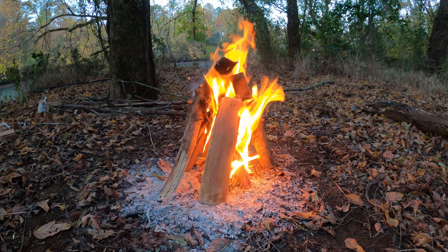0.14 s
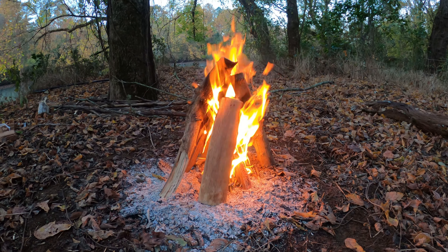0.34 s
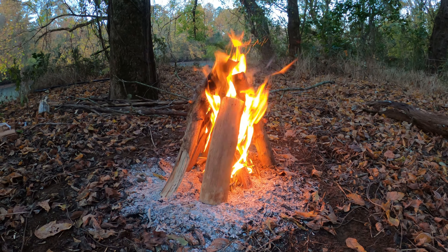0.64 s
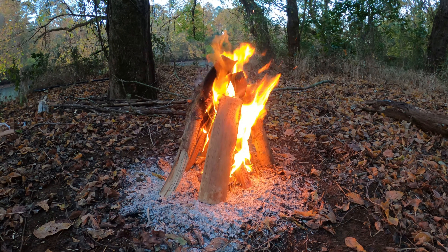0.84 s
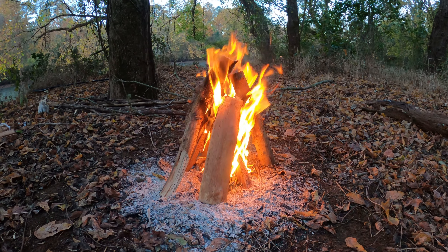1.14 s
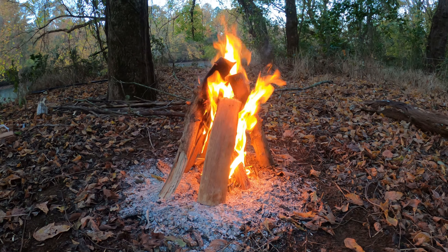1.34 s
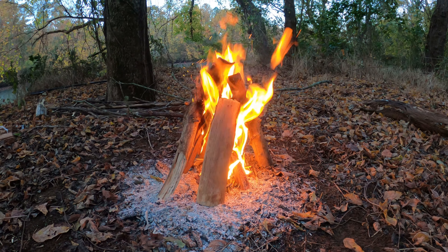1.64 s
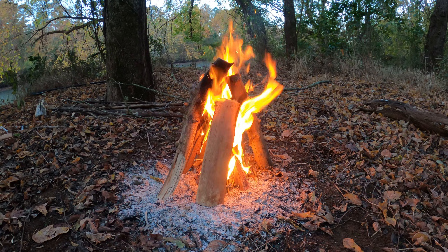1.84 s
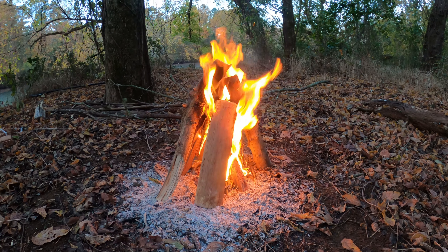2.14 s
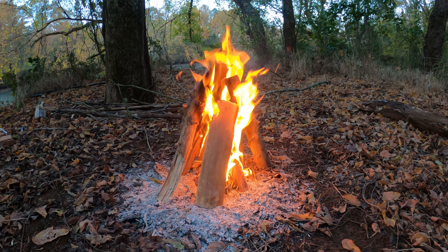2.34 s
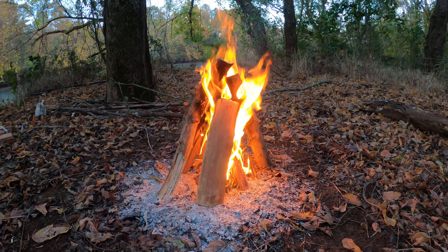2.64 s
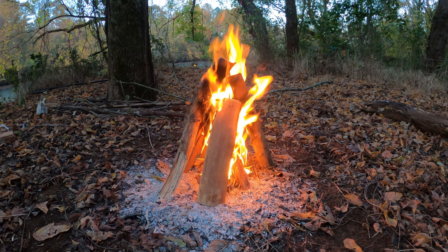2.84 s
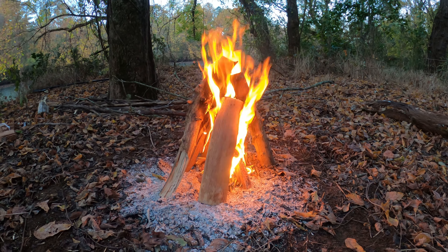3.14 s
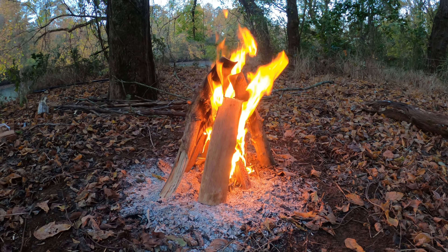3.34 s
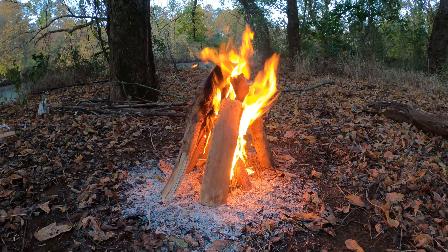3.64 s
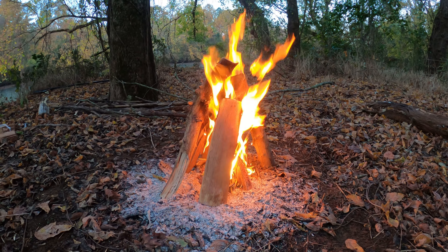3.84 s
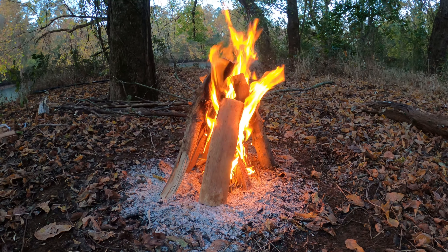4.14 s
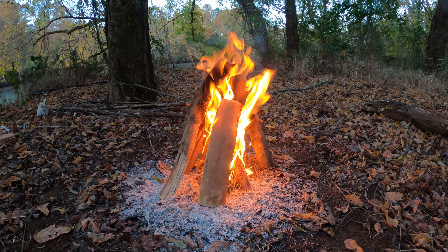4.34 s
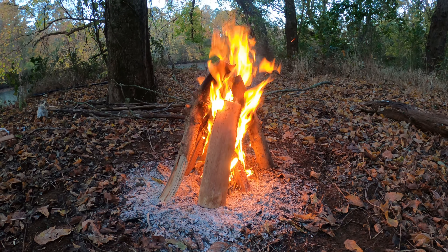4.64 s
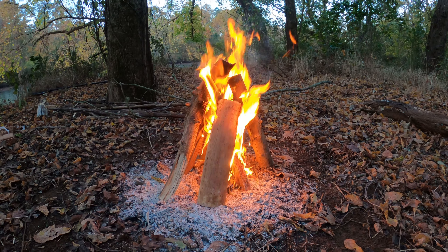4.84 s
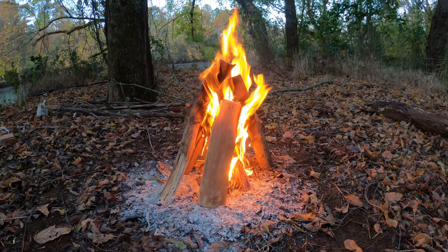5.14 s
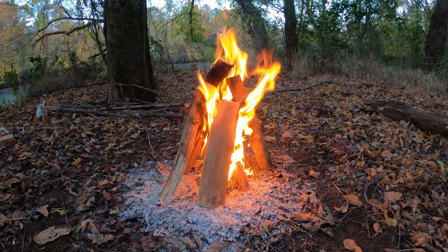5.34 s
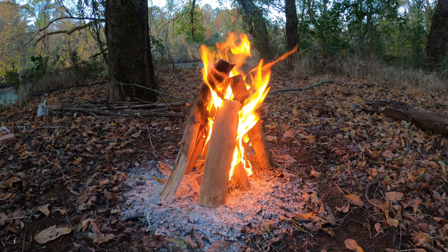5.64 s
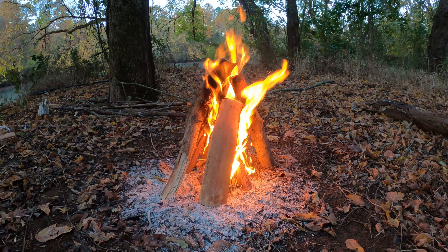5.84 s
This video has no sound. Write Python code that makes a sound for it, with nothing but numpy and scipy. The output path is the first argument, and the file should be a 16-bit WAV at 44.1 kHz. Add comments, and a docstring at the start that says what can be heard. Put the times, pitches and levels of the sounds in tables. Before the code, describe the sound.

Close wood fire outdoors: dry snapping pops, fine crackling and small gas puffs above a low steady rumble, with a faint far bird whistling.

```python
"""A campfire of split logs pops sharply: pockets of steam fracture the wood into brief, ringing pulses.
Gas jets spit as shaped noise and ignite in soft push-pull whumps; tiny fractures crackle in the char.
The flames rumble and boiling sap hisses as coloured, slowly modulated noise.
Leaf litter and trees answer through diffuse tails; a far bird whistles thinly, a swept tone heard by its tail alone."""
import sys
import numpy as np
from scipy import signal
from scipy.fft import rfft, irfft, next_fast_len
from scipy.io import wavfile
from scipy.ndimage import uniform_filter1d

SR = 44100
rng = np.random.default_rng(int(sys.argv[2]) if len(sys.argv) > 2 else 0)


def unload_audio(sound):
    """Save the sound as a 16-bit wav file, at the path given as the first command line argument."""
    columns = np.transpose(np.atleast_2d(sound))
    # keep every value between -1 and 1, then stretch to whole-number steps
    steps = np.round(np.clip(columns, -1, 1) * 32767)
    wavfile.write(sys.argv[1], SR, steps.astype(np.int16))


N = 264732
TIME = np.arange(N) / SR

# how hard the sap boils in the logs, before the hiss gain: time_s, level_db
BOILING = [(0.0, -59), (0.08, -61), (0.98, -66.5), (1.49, -60), (2.29, -65.5), (3.68, -64), (3.78, -62.5),
           (4.39, -60.5), (5.5, -65.5), (6.0, -60.5)]


def from_db(db):
    """Convert decibels to an amplitude ratio."""
    return 10 ** (np.asarray(db) / 20)


def rms_one(x):
    """Normalise to unit root-mean-square amplitude."""
    return x / np.sqrt(np.mean(x ** 2) + 1e-20)


def in_time(rows):
    """Interpolate a breakpoint curve linearly at every sample."""
    return np.interp(TIME, *np.transpose(rows))


def at_hz(points, hz):
    """Interpolate a spectrum on a logarithmic frequency axis."""
    table_hz, values = np.array(points).T
    return np.interp(np.log(hz + 1e-3), np.log(table_hz), values)


def add(out, s, sound):
    """Superpose a sound from time s in seconds."""
    start = int(np.clip(round(s * SR), 0, N - 1))
    out[start:start + len(sound)] += sound[:N - start]


def drift(rate):
    """Random modulation: straight lines join normal values of spread 1, drawn at rate per second."""
    knots = rng.standard_normal(4096)
    return np.interp(TIME * rate, np.arange(len(knots)), knots)


def stereo_noise(spectrum):
    """A diffuse field: coloured noise whose correlation between the ears falls from bass to treble."""
    # correlation of the two ears: frequency_hz, correlation
    ear_likeness = [(60, 0.99), (300, 0.98), (650, 0.69), (1400, 0.7), (3100, 0.48), (6800, 0.12),
                    (15000, 0.23)]
    hz = np.fft.rfftfreq(N, 1 / SR)
    mid, side = rfft(rng.standard_normal((2, N)))
    alike = np.clip(at_hz(ear_likeness, hz), -1, 1)
    pair = np.sqrt(1 + alike) * mid + np.sqrt(1 - alike) * side * [[1], [-1]]
    return rms_one(irfft(pair * from_db(at_hz(spectrum, hz)), N))


def echoes(x, spectrum, t60, onset_s):
    """Diffuse reverberation: convolution with a unit-energy noise tail that builds up and decays."""
    tail = stereo_noise(spectrum) * from_db(-60 * TIME / t60) * (1 - np.exp(-TIME / onset_s))
    tail /= np.sqrt(np.sum(tail ** 2) / 2)
    return signal.fftconvolve(x[None], tail[:, :2 * SR], axes=1)[:, :N]


def pulse(spectrum, detail_db=0, size=512):
    """Minimum phase: the most abrupt causal pulse with a given spectrum, by folding its cepstrum."""
    level_db = at_hz(spectrum, np.fft.rfftfreq(size, 1 / SR)) + detail_db
    cepstrum = irfft(np.log(from_db(level_db)))
    cepstrum[1:size // 2] *= 2
    cepstrum[size // 2 + 1:] = 0
    return irfft(np.exp(rfft(cepstrum)))


def reflections(scatter_db=-4.0, scatter_s=0.00087, size=512, order=15):
    """Multipath interference: bounces among the logs ripple the spectrum but keep its broad colour."""
    paths = rng.standard_normal(size) * (rng.random(size) < .25) * np.exp(-np.arange(size) / SR / scatter_s)
    paths[:6] = 0
    paths *= from_db(scatter_db) / np.linalg.norm(paths)
    paths[0] = 1   # the straight path
    ripple = np.abs(rfft(paths))
    broad_colour = np.sqrt(uniform_filter1d(ripple ** 2, size=order))
    return 20 * np.log10(ripple / broad_colour + 1e-3)


def burst(knock_db, bite_db, snap_db, ring_hz, ring_db=7.0, ring_octaves=0.27, lag_hz=2400, size=512):
    """Fracture: a source too small to radiate much bass excites a splinter's damped resonance."""
    shape = [(60, knock_db - 11), (400, knock_db - 1.5), (780, knock_db - 12.5),
             (1100, -1.5), (1800, -1.2), (3200, bite_db - 3.5),
             (5100, (bite_db + snap_db) / 2 - 3.5), (7400, snap_db + 0.5),
             (10800, snap_db - 5.5), (12500, snap_db - 10.5), (16000, snap_db - 26.0)]
    detune = np.log2((np.fft.rfftfreq(size, 1 / SR) + 1) / ring_hz) / ring_octaves
    resonance_db = ring_db / (1 + detune ** 2)
    sound = pulse(shape, resonance_db + reflections())
    # the split opens over a fraction of a millisecond, so its ring swells just after the first push:
    # an all-pass filter delays it without changing the spectrum
    poles = signal.butter(2, lag_hz, fs=SR)[1]
    return signal.lfilter(poles[::-1], poles, sound)


def flames():
    """Unsteady combustion radiates a deep rumble with random swells; a few times the level dips briefly."""
    # spectral density of the rumble: frequency_hz, level_db
    rumble_spectrum = [(15, -12.5), (28, 0), (48, 5), (100, 1), (150, -3), (210, -8), (300, -16.5),
                       (420, -30), (600, -36), (900, -38.5), (2500, -61)]
    # brief dips in level: deepest_s, depth_db, half_width_s (to 1/e of the depth in dB)
    level_dips = [(0.0, 12, 0.0099), (1.016, 16, 0.0083), (2.575, 10, 0.035), (3.42, 6.5, 0.019),
                  (3.97, 6, 0.057), (4.804, 20, 0.022), (5.64, 6, 0.059)]
    rumble_db, swell_db, swells_per_s = -36, 1.5, 18.0
    dip_db = sum(depth_db * np.exp(-((TIME - s) / width_s) ** 2) for s, depth_db, width_s in level_dips)
    level_db = rumble_db + swell_db * drift(swells_per_s) - dip_db
    return stereo_noise(rumble_spectrum) * from_db(level_db)


def sizzle(level_db=2.0, flicker_db=1.1):
    """Turbulent steam seeping from the log ends makes broadband noise, a faint, flickering hiss."""
    # spectral density of the hiss: frequency_hz, level_db
    hiss_spectrum = [(400, -0.5), (800, -8), (1250, 3), (2100, -8), (3500, -3.5), (4900, -9), (7800, -9.5),
                     (9800, -14), (11000, -21.5), (13000, -17.5), (16000, -52)]
    flicker = flicker_db * drift(22.98)
    return stereo_noise(hiss_spectrum) * from_db(in_time(BOILING) + level_db + flicker)


def crackle(level_db=-34.0, spread_db=4.0, bite_db=-3.5, colour_db=8.5, count=480):
    """Random tiny fractures in the char, mostly faint, crowd in proportion to the boiling power."""
    out = np.zeros(N)
    boiling = np.cumsum(from_db(2 * in_time(BOILING)))   # doubled decibels turn amplitude into power
    for when, chance, tint, pitch in rng.random((count, 4)):
        bright_db = colour_db * (2 * tint - 1)
        excess_db = spread_db * min(-np.log(chance + 1e-9), np.pi)
        size_db = level_db + excess_db - bright_db / 2   # smaller splits are brighter
        s = np.searchsorted(boiling, when * boiling[-1]) / SR
        snap_db = bite_db + 2 * bright_db - 5.5
        ring_hz = 1500 * 2 ** (2 * pitch)
        add(out, s, from_db(size_db) * burst(-24.0, bite_db + bright_db, snap_db, ring_hz))
    return out


def pops(level_db=1.57):
    """Steam pressure fractures wood in steps; directivity sets the direct and the scattered share."""
    # wood bursting: start_s, crack_db (near 1.5 kHz, before level_db), bright_db (7.5 kHz re crack),
    # ring_hz (splinter), knock_db (low mids re crack)
    pop_events = [(0.0401, -7.5, -10, 1500.0, -14.0), (0.0486, -6, -5.5, 3540, -1),
                  (0.053, -3, -6, 1800, 0), (0.0952, 13, -6.5, 3000.0, -17.5),
                  (0.0994, 11, -16.5, 3180.0, -7.5), (0.369, 6, -11, 2500, -2.5),
                  (0.4, -6, -4.0, 5200, 1.5), (0.6233, 4.5, -5.5, 3180.0, -10.5),
                  (0.7048, 2.5, -11, 1420, 3.5), (0.78, -16.5, -2.5, 1600, -8),
                  (1.167, -9.0, -23, 2380.0, 0), (1.2173, -2.5, -6, 3300, 3.5),
                  (1.313, -29.5, 6, 2700, -10), (1.3796, 1, -14.5, 3630, -9), (1.455, 13, -16.5, 4460, -15),
                  (1.5607, -7.5, -8, 3200, 9), (1.5707, 12.5, -6, 2710, -7),
                  (1.8983, 3.5, -15.5, 2930, -5.5), (1.9196, 0.5, -4.5, 1510, 0.5),
                  (2.1611, 4, -23.5, 1480, -11), (2.5133, -12, -13, 3170, -6), (2.5248, 12, -4, 6470, -1.5),
                  (2.6203, -7, 4.0, 1490, -5), (2.7661, -7.5, -15, 5960, -8), (2.956, -0.5, -7, 3150, -14),
                  (3.1821, -14, 0.0, 3370.0, 5), (3.685, 4.5, -11, 3600, -17),
                  (3.7436, -10, -10.5, 2100, 0), (3.794, -25.5, 7.5, 3170, -8),
                  (3.8855, -20, 5.5, 3400, 23), (4.0086, -10, 0.5, 1450, -13.0),
                  (4.147, -5.5, -2.5, 1680.0, 2.5), (4.2562, 0.5, -14, 3500, -0.5),
                  (4.2748, -1.5, -14.0, 4160, -3.5), (4.3484, -23.5, 6, 3850, -10),
                  (4.42, -15, -9, 1510, 11), (4.4512, -15, -1.5, 5660.0, -17.0),
                  (4.4643, 5.0, -2, 3140, -22), (4.5185, 1.5, 0.5, 1450, -6), (4.6842, 1.0, -7, 4850, -12),
                  (4.6989, -4, -9, 3320, -14), (4.771, 5, -3, 4440, -11), (4.9538, -8.5, -11.5, 2130, -2),
                  (5.1295, -19, 0, 1490, 1), (5.4962, 1.5, -14.5, 3480, -3),
                  (5.6702, -11, -11.5, 1640, 3.0), (5.735, 0.5, -13, 6460, -2.5),
                  (5.9869, -9.5, -6, 3720, -23)]
    bite_base_db, bite_per_db = 3.24, 0.5748   # 3.4 kHz re the crack; it rises with the brightness
    sent_db, sent_per_db = -7.5, -0.3   # a pop that faces away is duller and goes more into the trees
    fore_crack_db, fore_crack_s = -22, 0.005   # the wood starts to give just before it bursts
    step_db, step_s = -7.5, 0.0005   # the split runs on in a second, weaker step
    chip_db, chip_s = -36, 0.026   # a chip strikes a log just after
    direct, sent = np.zeros((2, N))
    timings = rng.uniform(.5, 1.2, (len(pop_events), 3))   # these scale the three nominal delays
    for (s, crack_db, bright_db, ring_hz, knock_db), (early, step, late) in zip(pop_events, timings):
        colour = bite_base_db + bite_per_db * bright_db, bright_db, ring_hz
        main = from_db(crack_db + level_db) * burst(knock_db, *colour)
        fore_crack = from_db(crack_db + fore_crack_db) * burst(-3.0, *colour)
        add(direct, s - fore_crack_s * early, fore_crack)
        add(direct, s, main)
        second_step = from_db(crack_db + step_db) * burst(-12.5, *colour)
        add(direct, s + step_s * step, second_step)
        chip = from_db(crack_db + chip_db) * burst(-9.0, 4.0, -1.0, 4700)
        add(direct, s + chip_s * late, chip)
        away_db = crack_db + sent_db + sent_per_db * bright_db
        add(sent, s, from_db(away_db) * burst(knock_db, *colour, ring_db=1.0))
    return direct, sent


def puff(whump_db, spit_db, spit_s, split_db=12.5, whump_s=0.001, lead_s=.0048, size=4096):
    """A jet makes noise, then igniting gas expands: a monopole's push and pull. Returns sound and lead."""
    t = np.arange(size) / SR
    swell = (t - lead_s) / whump_s
    whump = -swell * np.exp((1 - swell ** 2) / 2)
    colour = pulse([(150, -7.5), (420, 2.5), (850, -14.5), (1400, -5.0),
                    (2600, -17.5), (5000, -22.5), (15000, -55)])
    crumbs = rng.standard_normal(size) * (rng.random(size) < .1)   # char flakes off in the jet
    jet_noise = rms_one(np.convolve(crumbs, colour)[:size])
    spit = jet_noise * (1 - np.exp(-t / 0.00053)) * np.exp(-t / spit_s)
    sound = from_db(whump_db) * whump + from_db(spit_db + 7.5) * spit
    # the split that lets the jet out
    add(sound, 0, from_db(spit_db + split_db) * burst(-11.0, 7.0, 1.0, 1470))
    return sound, lead_s


def puffs(flutter_db=-47.0, spit_db=-22.0, spread_db=7.0, count=100):
    """Intermittent ignition: strong whumps, and many weak ones at random as the flames flutter."""
    # gas jets igniting: whump_centre_s, whump_db, spit_db (before the gains in puff)
    jet_ignitions = [(0.249, -44, -42.5), (0.272, -32.5, -47), (0.424, -31.5, -41.5), (0.71, -36, -38),
                     (0.764, -42, -51), (1.222, -24.5, -50.5), (1.257, -31, -43.5), (1.458, -23.5, -32),
                     (1.573, -22.5, -51), (1.669, -21.5, -37.5), (1.7265, -16.5, -32.5),
                     (1.735, -28, -39.5), (2.18, -23, -37), (2.366, -36, -52), (2.551, -29.5, -47),
                     (3.239, -20, -37.5), (3.346, -21.5, -37.5), (3.464, -21.5, -36), (3.891, -32.5, -51.5),
                     (4.047, -34.5, -46.5), (4.471, -26, -39.5), (4.7447, -28, -43.5)]
    spit_decay_s = 0.0047
    out, weak = np.zeros(N), []
    for when, chance, spitting in rng.random((count, 3)):
        whump_db = flutter_db + spread_db * min(-np.log(chance + 1e-9), np.e)
        weak_spit_db = whump_db + spit_db + spread_db * (2 * spitting - 1)
        weak.append((when * N / SR, whump_db, weak_spit_db))
    for s, *jet in list(jet_ignitions) + weak:
        sound, lead_s = puff(*jet, spit_decay_s)
        add(out, s - lead_s, sound)
    return out


def bird(level_db=-0.5, rise_s=0.0091, sweep_hz=1800, buzz_per_s=170.0):
    """Frequency modulation makes a rising whistle buzz; only its reverberation in the trees is heard."""
    # far calls: start_s, level_db (before the call gain), top_pitch_hz
    bird_calls = [(1.068, -55, 7870), (2.976, -58, 7730), (3.796, -57, 7770), (4.914, -63, 7500),
                  (5.882, -56, 7450)]
    call_s, forest_t60 = .07, .35   # seconds
    out, t = np.zeros(N), np.arange(int(call_s * SR)) / SR
    for s, call_db, top_hz in bird_calls:
        buzz_hz = sweep_hz * np.abs(signal.sawtooth(2 * np.pi * buzz_per_s * t))
        hz = top_hz - 900 * np.exp(-t / rise_s) - buzz_hz
        whistle = np.sin(2 * np.pi * np.cumsum(hz) / SR) * signal.windows.tukey(len(t), .3)
        add(out, s, from_db(call_db + level_db) * whistle)
    return echoes(out, [(1000, 0), (16000, 0.012)], t60=forest_t60, onset_s=0.00074)


def both_ears(x):
    """Interaural phase: sound straight from the fire reaches the left ear slightly later."""
    # lag of the left ear behind the right: frequency_hz, phase_rad
    left_lag = [(100, 0.05), (400, 0.2), (1000, 0.41), (2500, 0.61), (4200, 0.93), (6000, 1.64),
                (8500, 0.96), (12000, 2.54), (16000, 1.04)]
    lag = at_hz(left_lag, np.fft.rfftfreq(N, 1 / SR))
    return np.array([irfft(rfft(x) * np.exp(-1j * lag), N), x])


def scene():
    """Superposition: the fire a little to the right, its tails from litter and trees, and the bird."""
    direct, sent = pops()
    small = crackle() + puffs()
    near, sent = direct + small, sent + small
    litter_spectrum = [(200, -5.5), (1200, -6.0), (4000, 1.5), (15000, 0)]
    litter = from_db(-9.0) * echoes(sent, litter_spectrum, t60=0.067, onset_s=0.0083)
    tree_spectrum = [(200, 2.0), (1500, -13.5), (4000, 2.0), (8000, -7), (15000, -10.0)]
    trees = from_db(-19.0) * echoes(sent, tree_spectrum, t60=0.56, onset_s=0.0057)
    return both_ears(near) + litter + trees + flames() + sizzle() + bird()


def record(dry):
    """Linear filtering favours the right side, hard clipping limits peaks, a low-pass cuts the top."""
    # how much more the right ear gets than the left: frequency_hz, lead_db
    right_lead = [(80, 0), (300, 1.55), (700, 2.5), (1300, 2), (2400, .4), (4600, -0.3), (8000, 6.5),
                  (10000, 0), (12000, 7), (16000, 6.5)]
    cutoff_hz = 16100
    size = next_fast_len(N + 2048)
    lead_db = at_hz(right_lead, np.fft.rfftfreq(size, 1 / SR))
    sides = from_db(lead_db / 2 * [[-1], [1]])
    balance = sides / sides.mean(axis=0)
    heard = irfft(rfft(dry, size) * balance, size)[:, :N]
    low_pass = signal.ellip(10, .1, 70, cutoff_hz, fs=SR, output="sos")
    return signal.sosfilt(low_pass, np.clip(heard, -1, 1))


dry = scene()
out = record(dry)
unload_audio(out)
```